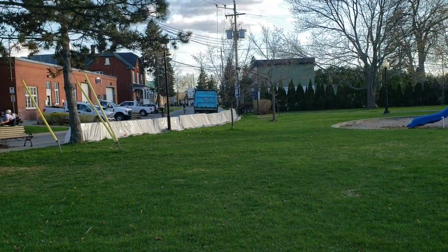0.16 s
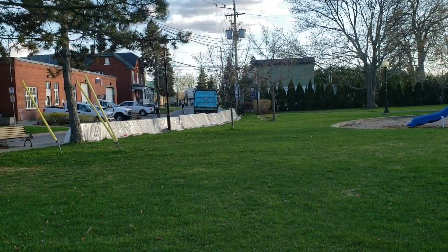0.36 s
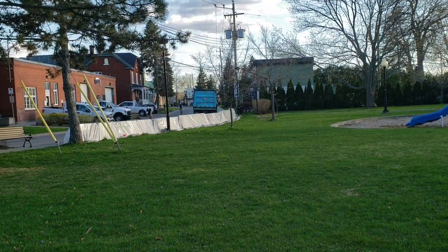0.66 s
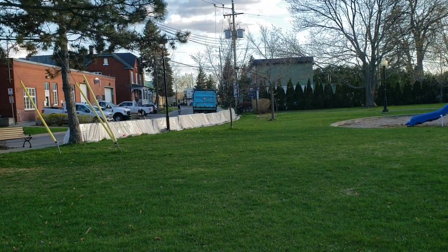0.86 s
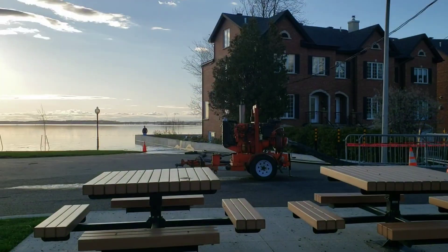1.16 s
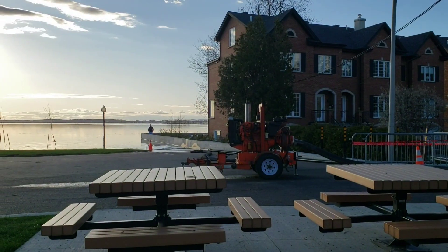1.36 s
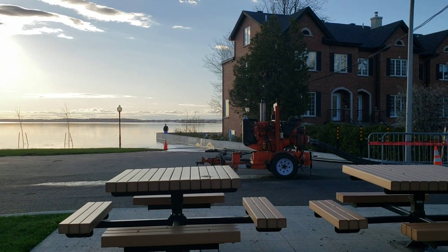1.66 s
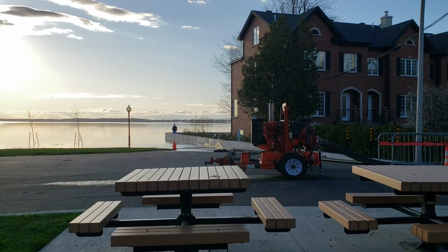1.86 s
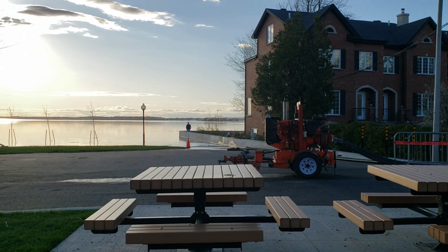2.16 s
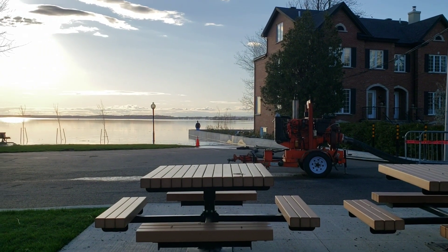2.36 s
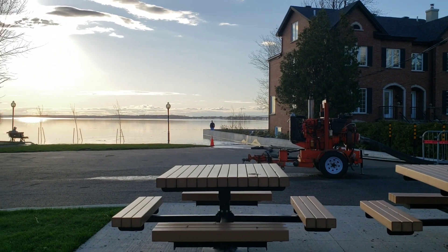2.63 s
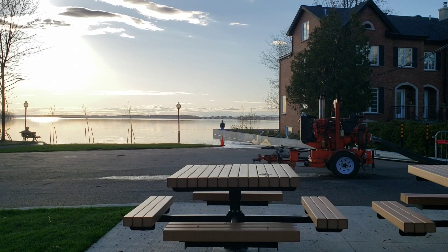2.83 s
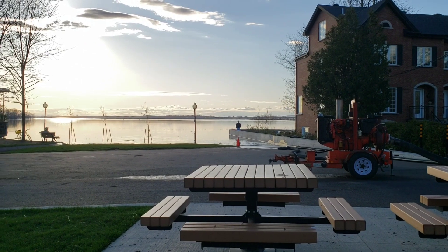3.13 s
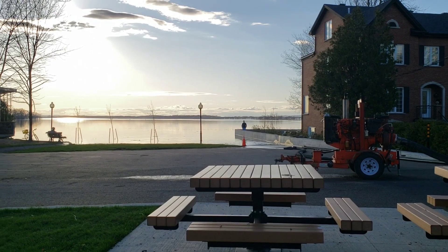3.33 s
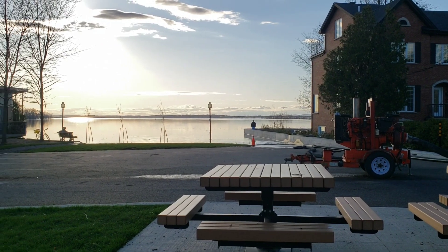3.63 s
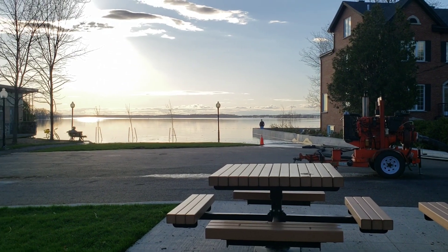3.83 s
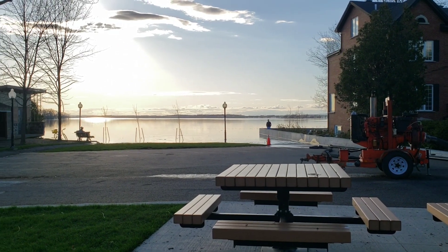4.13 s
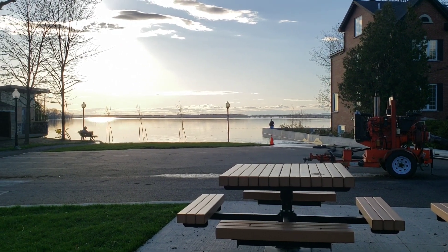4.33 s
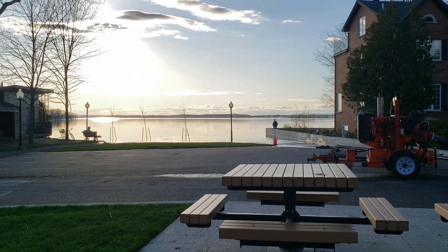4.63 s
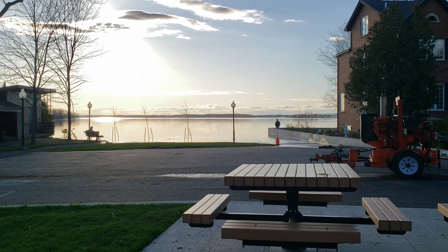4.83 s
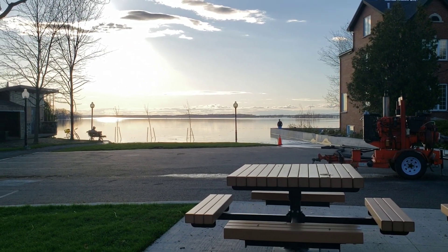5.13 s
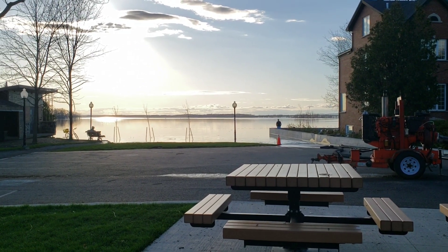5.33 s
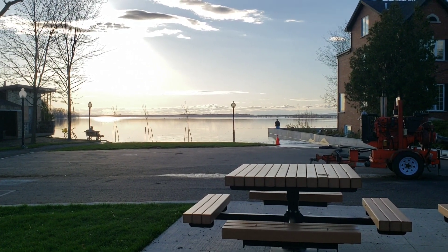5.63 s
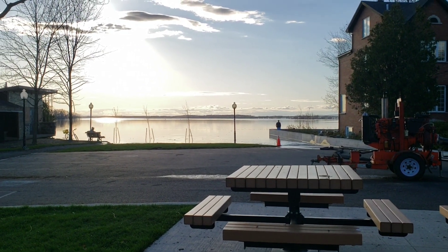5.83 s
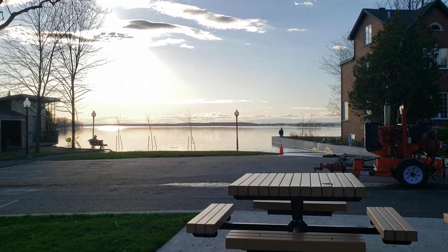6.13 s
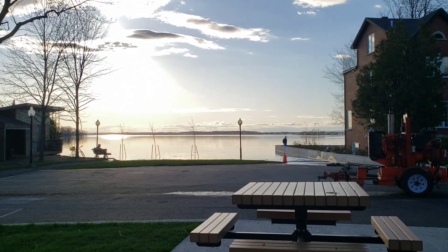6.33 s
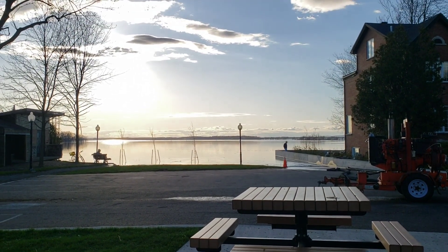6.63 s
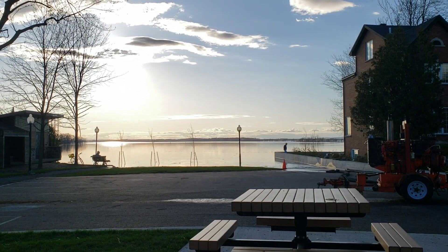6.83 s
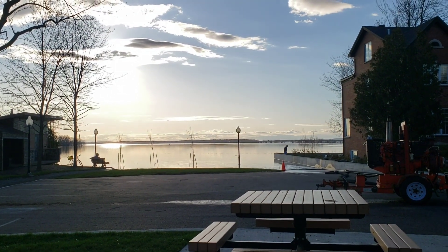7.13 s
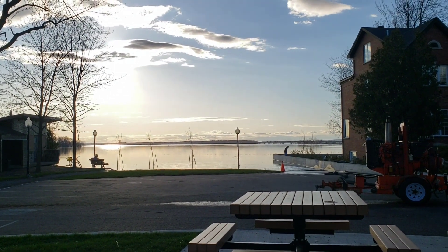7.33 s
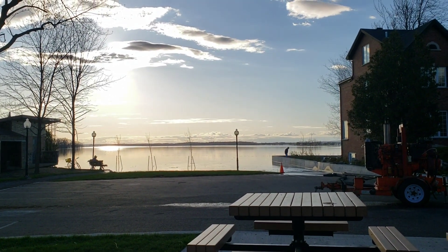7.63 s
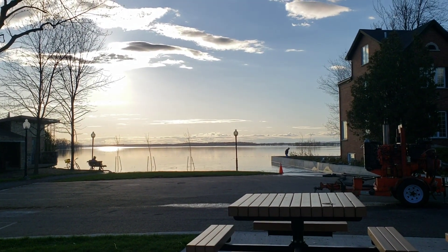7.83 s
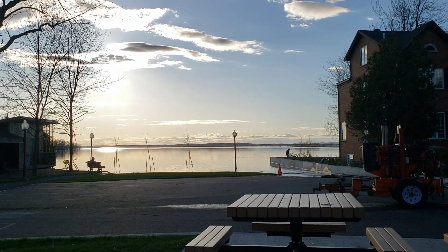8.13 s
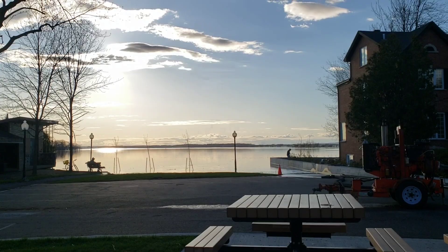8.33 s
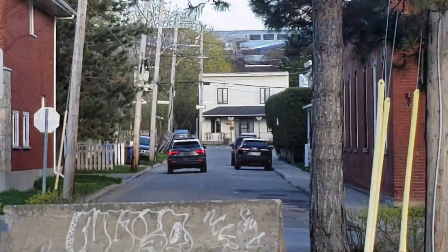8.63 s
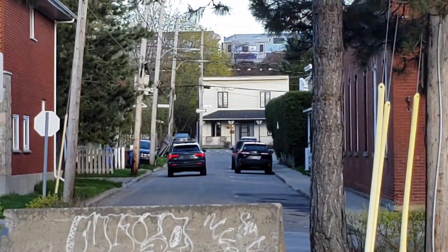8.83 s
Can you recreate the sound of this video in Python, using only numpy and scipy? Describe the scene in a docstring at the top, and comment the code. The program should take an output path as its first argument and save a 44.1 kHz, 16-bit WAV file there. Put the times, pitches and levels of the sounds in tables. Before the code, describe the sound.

A faint park rumble fades into a diesel pump droning, clattering and hissing, which gives way to a car idling on a street.

```python
"""A trailer-mounted diesel flood pump runs on a lakeside road. Its exhaust drones at harmonics of the cycle
rate, combustion knocks ring the block, and a slower pump shaft clatters and puffs hissing air from a vent.
The scene opens with a far rumble across a park, which fades into the pump; the pump swells once and holds
while the microphone pans, then fades into a street where a car engine idles."""
import sys
import numpy as np
from scipy import signal
from scipy.fft import rfft, irfft, next_fast_len
from scipy.io import wavfile
from scipy.ndimage import map_coordinates

SR = 44100
rng = np.random.default_rng(int(sys.argv[2]) if len(sys.argv) > 2 else 0)


def store_pcm(level_fs):
    """Save levels as 16-bit WAV."""
    pcm = np.round(np.clip(level_fs, -1, 1) * 32767).astype(np.int16)
    wavfile.write(sys.argv[1], SR, np.atleast_2d(pcm).T)


N = 396018
TIME = np.arange(N) / SR

# interaural level difference of the pump: f/Hz, left minus right level/dB
PUMP_BALANCE = [(60, 0.5), (110, -1), (200, 1.5), (700, 1), (1300, 2), (2400, 3.5), (4400, 0.5),
                (8100, -1.5), (15000, -3)]


def from_db(db):
    """Amplitude ratio of a level: a factor of ten per 20 dB."""
    return 10 ** (np.asarray(db) / 20)


def rms_one(x):
    """Normalisation to unit mean power."""
    return x / np.sqrt(np.mean(x ** 2) + 1e-20)


def ramp(start_s, end_s):
    """Linear rise from 0 to 1 between two times."""
    return np.clip((TIME - start_s) / (end_s - start_s), 0, 1)


def drift(rate_hz):
    """Slow random modulation: straight lines between Gaussian values of unit variance."""
    knots = rng.standard_normal(2000)
    return np.interp(TIME * rate_hz, np.arange(len(knots)), knots)


def at_bins(points, size):
    """Interpolation of a table over log frequency onto the bins of a spectrum."""
    hz, value = np.transpose(points)
    return np.interp(np.log(np.fft.rfftfreq(size, 1 / SR) + 1e-9), np.log(hz), value)


def colour(x, spectrum):
    """Zero-phase filtering by a table of f/Hz, gain/dB."""
    size = next_fast_len(x.shape[-1], True)
    return irfft(rfft(x, size) * from_db(at_bins(spectrum, size)), size)[..., :x.shape[-1]]


def resonate(x, modes):
    """Modal superposition: damped resonators in parallel, alternating in sign; rms 1."""
    out = 0
    for k, (hz, width_hz, db) in enumerate(modes):
        r = np.exp(-np.pi * width_hz / SR)
        poles = [1, -2 * r * np.cos(2 * np.pi * hz / SR), r * r]
        out = out + (-1) ** k * from_db(db) * signal.lfilter([1 - r * r, 0, r * r - 1], poles, x)
    return rms_one(out)


def orders(cycles, table, waver):
    """Rotational orders: sines phase-locked to a shaft, each with random amplitude modulation."""
    out = 0
    for multiple, db in table:
        amplitude = np.sqrt(2) * from_db(db) * (1 + waver * drift(28))
        out = out + amplitude * np.sin(2 * np.pi * (multiple * cycles + rng.random()))
    return out


def ambience(spectrum, coherence, balance):
    """Partially coherent noise at two ears, mixed from a common and an opposed part; rms 1."""
    size = next_fast_len(N, True)
    mid, side = rfft(rng.standard_normal((2, size))) * from_db(at_bins(spectrum, size))
    alike = at_bins(coherence, size)
    ears = np.sqrt(1 + alike) * mid + np.sqrt(1 - alike) * side * [[1], [-1]]
    ear_gains = from_db(at_bins(balance, size) * [[.5], [-.5]])
    return rms_one(irfft(ears * ear_gains, size)[:, :N])


def park():
    """Superposition of far machinery: rumble, thin whistles, an engine's throb and a passing hum."""
    # far rumble: f/Hz, relative level/dB
    rumble_spectrum = [(20, -22), (40, -9), (62, -1), (100, -2), (170, -5), (280, -10), (330, -13),
                       (410, -12), (470, -22), (900, -21), (1300, -28), (1800, -21), (2900, -29),
                       (5500, -26), (8000, -29), (10000, -43), (12000, -38), (15500, -43)]
    # its likeness at the ears: f/Hz, coherence
    coherence = [(60, 0.8), (290, 0.94), (640, 0), (1400, 0), (15000, 0)]
    # machinery whistles: f/Hz, bandwidth/Hz, relative level/dB
    whistle_modes = [(1890, 570, 0.5), (3740, 87, -3), (4930, 55, -4), (5950, 88, -2), (6280, 110, -2),
                     (7000, 50, -4), (8200, 67, -4), (12800, 360, -16)]
    hum_hz, firing_hz = 248, 62.6
    hum = np.sqrt(2) * np.sin(2 * np.pi * np.cumsum(hum_hz + 3.1 * drift(13.3)) / SR)
    hum *= ramp(.15, .57) * (1 - ramp(.65, .73))
    throb = from_db(-4) * (1 + .34 * drift(6.1)) * np.sqrt(2) * np.sin(2 * np.pi * firing_hz * TIME)
    rumble = ambience(rumble_spectrum, coherence, balance=[(100, -.5), (5000, .4)])
    whistles = from_db(-8.5) * resonate(rng.standard_normal((2, N)), whistle_modes)
    return from_db(-49 + 1.5 * TIME) * (rumble + whistles + throb) + from_db(-53) * hum


def street():
    """Periodic firing makes an idling car throb over the broadband noise of traffic."""
    # engine orders: multiple of the firing rate, level/dB relative to the traffic
    car_orders = [(.8, -18), (1, 3), (1.2, -2), (1.4, -6.5), (1.8, -4.5), (2, -8), (2.4, -13), (3, -24)]
    # traffic noise: f/Hz, relative level/dB
    traffic_spectrum = [(25, -22), (60, 4.5), (100, -4), (160, -6.5), (240, -4), (330, -9), (500, -15.5),
                        (750, -13), (1300, -15.5), (3000, -16.5), (4300, -14), (5500, -24.5), (7500, -24.5),
                        (9000, -35.5), (15000, -31)]
    # its likeness at the ears: f/Hz, correlation
    coherence = [(60, 0.99), (130, 0.99), (290, 0.94), (640, 0.85), (1410, 0.42), (3100, -0.74),
                 (6820, 0.15), (15000, 0.03)]
    # its direction: f/Hz, left minus right level/dB
    balance = [(60, 1), (110, -4), (200, 1), (380, 2), (700, 2), (1290, 3), (2380, 2.5), (4400, 2.5),
               (8120, 10.5), (15000, 5)]
    firing_hz = 74.7
    firings = np.cumsum(firing_hz * (1 + .0019 * drift(16))) / SR
    car = orders(firings, car_orders, waver=.22)
    return from_db(-33) * (car + ambience(traffic_spectrum, coherence, balance))


def house_reflections(x, t60_s):
    """Reverberation: a short tail from the houses, different at each ear, lowers the coherence."""
    # likeness at the ears: f/Hz, coherence
    coherence = [(150, .998), (290, .985), (640, .93), (1400, .88), (2500, .6)]
    size, t = next_fast_len(N + SR, True), np.arange(SR // 2) / SR
    tail = rng.standard_normal((2, len(t))) * from_db(-60 * t / t60_s) * (t > .004)
    alike = at_bins(coherence, size)
    paths = np.sqrt(alike) + np.sqrt(1 - alike) * rfft(tail / np.linalg.norm(tail[0]), size)
    ear_gains = from_db(at_bins(PUMP_BALANCE, size) * [[.5], [-.5]])
    return irfft(rfft(x, size) * paths * ear_gains, size)[:, :N]


def frame_echoes(air):
    """Interference with echoes in the trailer frame: a tinny grain that shifts as the microphone pans."""
    echo_gain, t60_s, change_s = from_db(-2.5), .066, 2.2
    t, pattern = np.arange(SR // 25) / SR, TIME / change_s
    out = 0
    for k in range(int(pattern[-1]) + 2):
        echoes = rng.standard_normal((2, len(t))) * from_db(-60 * t / t60_s) * (t > .001)
        share = np.cos(np.pi / 2 * np.clip(pattern - k, -1, 1))   # equal-power crossfade
        out = out + share * signal.oaconvolve(air, echoes / np.linalg.norm(echoes[0]), axes=1)[:, :N]
    return (air + echo_gain * out) / np.hypot(1, echo_gain)


def swell(subdued, full):
    """Raised-cosine passage from the subdued value to the full one as the pump swells."""
    progress = .5 - .5 * np.cos(np.pi * ramp(2.32, 3.65))
    return subdued + (full - subdued) * progress


def vent_hiss(pump):
    """Jet noise from the priming vent excites cavity resonances; the treble puffs once a turn."""
    # air jet: f/Hz, relative level/dB
    jet_spectrum = [(700, -13.5), (1100, -11.5), (1500, -3.5), (2050, -6.5), (2650, -11.5), (3400, -8),
                    (4500, -8.5), (5800, -5.5), (7300, -5.5), (8200, -4.5), (9400, -12), (12000, -10.5),
                    (13400, -9), (15300, -10.5)]
    # its likeness at the ears: f/Hz, coherence
    coherence = [(1000, .8), (2500, .42), (5000, .74), (15000, .72)]
    # cavity whistles and high sizzle: f/Hz, bandwidth/Hz, relative level/dB
    whistle_modes = [(2700, 48, -11), (3510, 230, -7), (4005, 28, -2), (4350, 58, -3), (4530, 32, -1),
                     (4810, 68, -2), (5110, 30, 1), (5330, 150, 0), (5800, 90, 1.5), (6420, 100, 0)]
    sizzle_modes = [(7810, 33.4, -12), (8230, 29, 10), (8400, 69, -0.5), (9370, 56, 3), (10640, 44, 3),
                    (11130, 54, 6), (11500, 82, -1), (11630, 91, 3), (12300, 350, 3.5), (13000, 46, 2),
                    (13900, 57, -4), (15050, 650, 2)]
    jet = from_db(-31.5) * ambience(jet_spectrum, coherence, PUMP_BALANCE)
    flow = ambience([(1000, 0), (15000, 0)], coherence, PUMP_BALANCE)   # white noise
    whistles = from_db(swell(-39.5, -38)) * resonate(flow, whistle_modes)
    sizzle = from_db(-37) * resonate(flow, sizzle_modes)
    air = frame_echoes(jet + whistles + sizzle)
    treble = colour(air, [(4000, -30), (6500, -9), (8500, 0)])
    puff = from_db(1.5 * np.cos(4 * np.pi * (pump - .335)) + .55 * drift(18))
    return (air + treble * (puff - 1)) * from_db(.29 * drift(14))


def hiss_at_ears(air):
    """Directivity: the swollen hiss peaks at one moment of the pan and weakens to either side."""
    # colour of the subdued hiss against the full one: f/Hz, gain/dB
    subdued_colour = [(1200, 1), (2200, 0.5), (3300, -6), (4700, 0), (6000, -6.5), (7800, 2.5), (9000, -7),
                      (9800, 0.5), (12000, -1.5), (14000, -1), (15300, -3)]
    aim_s, falloff_db_per_s2, lag_ms = 5.62, .19, .182
    off_aim_db = swell(0, falloff_db_per_s2 * (TIME - aim_s) ** 2)
    left, right = from_db(swell(-6, 1.1) - off_aim_db) * swell(colour(air, subdued_colour), air)
    # the hiss reaches the left ear slightly later, by a constant lag, so it sits on the right
    return np.array([np.roll(left, round(lag_ms * SR / 1000)), right])


def strikes(cycles, phase, spread_db, jitter_s):
    """Impulse train: one click a cycle at the given phase, uneven in strength and time."""
    onsets = np.flatnonzero(np.diff(np.floor(cycles - phase)) > 0)
    timing, strength = rng.standard_normal((200, 2))[:len(onsets)].T
    onsets += (timing * jitter_s * SR).astype(int)
    clicks = np.zeros(N)
    clicks[np.clip(onsets, 0, N - 1)] = from_db(spread_db * strength)
    return clicks


def rattle(power, t60_s):
    """Exponential decay of energy: every blow leaves a dying burst of noise."""
    retained = from_db(-60 / (t60_s * SR)) ** 2
    energy = signal.lfilter([1], [1, -retained], power + 1e-18)
    return np.sqrt(energy) * rng.standard_normal(N)


def diesel_knock(engine):
    """Impulse excitation: combustion knocks and the loose parts they shake ring the block's modes."""
    # knocks: phase/cycles, relative level/dB
    knocks = [(.07, 3), (.14, -9.5), (.23, -2.5), (.58, 0.5), (.64, 1.5), (.74, -12)]
    # engine block: f/Hz, bandwidth/Hz, relative level/dB
    block_modes = [(1149, 52, -9), (1427, 54, -1), (1637, 73, -4), (1739, 31, -2.5), (1995, 132, -8.5),
                   (3270, 1240, -14)]
    blows = sum(from_db(db) * strikes(engine, phase, spread_db=.6, jitter_s=.00015)
                for phase, db in knocks)
    loose_parts = from_db(-4) * rms_one(rattle(blows ** 2, t60_s=.037))
    return from_db(-38) * resonate(rms_one(blows) + loose_parts, block_modes)


def casing_clatter(pump):
    """Impact sound: each contact rings the casing with its own impulse response, plus random rattle."""
    # pump contacts: phase/cycles, relative level/dB
    contacts = [(.01, -4.5), (0.119, -3), (0.428, -6.5), (.545, -3.5), (.62, -5.5)]
    # casing response: f/Hz, gain/dB
    casing_response = [(450, -42), (540, -14.5), (620, -1.5), (800, -4), (900, -1), (1000, -15),
                       (1250, -14.5), (2000, -21.5)]
    t60_s, t = .12, np.arange(SR // 10) / SR
    decay = from_db(-60 * t / t60_s)
    ring, power = 0, 0
    for phase, db in contacts:
        clicks = from_db(db) * strikes(pump, phase, spread_db=1.2, jitter_s=.00008)
        ring = ring + signal.oaconvolve(clicks, decay * rng.standard_normal(len(t)))[:N]
        power = power + clicks ** 2
    return from_db(-43.5) * rms_one(colour(ring + rattle(power, t60_s), casing_response))


def drone(engine, pump):
    """Pulsating flow: exhaust and pump harmonics, with gas rumble and resonances that surge each turn."""
    # harmonics of each shaft: multiple of its cycle rate, relative level/dB
    exhaust_orders = [(2, -80), (4, -36), (6, -46.5), (8, -48), (9, -77.5), (10, -47.5), (12, -59),
                      (13, -62), (15, -77), (16, -51.5), (19, -58.5), (26, -45)]
    pump_orders = [(8, -48.5), (12, -46), (13, -49), (20, -50), (26, -55.5)]
    # exhaust gas: f/Hz, relative level/dB
    gas_spectrum = [(20, -26), (35, -14), (55, 4), (85, -1.5), (110, 1), (150, 0.5), (200, -0.5), (290, -1),
                    (320, -36), (420, -6.5), (480, -32.5), (800, -6.5), (1100, -19)]
    # fan hum (first row), muffler and pump pipe: f/Hz, bandwidth/Hz, relative level/dB
    fan_and_muffler_modes = [(165.8, 2.6, 3), (251.3, 18.4, -5.5), (373.7, 19.3, -6.5)]
    pipe_modes = [(403.5, 5.7, 0)]
    tones = orders(engine, exhaust_orders, waver=.055) + orders(pump, pump_orders, waver=.06)
    tones = colour(tones, [(300, 0), (400, -10)])   # the muffler attenuates the high orders
    surge = from_db(2.7 * np.cos(4 * np.pi * (engine - .27)))
    stroke = from_db(2.8 * np.cos(4 * np.pi * (pump - .14)))
    rumble = from_db(-35.5) * rms_one(colour(rng.standard_normal(N), gas_spectrum)) * surge
    muffler = from_db(-45.5) * resonate(rng.standard_normal(N) * surge, fan_and_muffler_modes)
    pipe = from_db(-52) * resonate(rng.standard_normal(N), pipe_modes) * rms_one(stroke)
    return tones + rumble + muffler + pipe


def flood_pump():
    """Two shafts time the whole machine; an interaural delay places it to the right, across the road."""
    # shaft speeds, two turns to a cycle: t/s, engine cycle rate/Hz, pump cycle rate/Hz
    speeds = [(2.0, 15.598, 11.329), (3.7, 15.646, 11.382), (5.0, 15.597, 11.368), (6.3, 15.595, 11.364),
              (7.6, 15.617, 11.35)]
    times, engine_hz, pump_hz = np.transpose(speeds)
    engine = np.cumsum(np.interp(TIME, times, engine_hz)) / SR   # phase/cycles
    pump = np.cumsum(np.interp(TIME, times, pump_hz)) / SR
    body = from_db(swell(-9.5, .08)) * drone(engine, pump)
    body += from_db(swell(-8, 2.5)) * (diesel_knock(engine) + casing_clatter(pump))
    left, right = house_reflections(body, t60_s=.15)
    # the left ear lags more as the microphone pans left and comes to rest
    lag_ms = .075 + .125 * ramp(1.47, 4.84)
    left = map_coordinates(left, [np.arange(N) - lag_ms * SR / 1000], order=5, mode="nearest")
    return np.array([left, right]) + hiss_at_ears(vent_hiss(pump))


def scene():
    """Linear crossfades lead from park to pump to street."""
    return (park() * (1 - ramp(.92, 1.2))
            + flood_pump() * ramp(.92, 1.16) * (1 - ramp(8.26, 8.86))
            + street() * ramp(8.39, 8.774))


def record(dry):
    """Band limiting: an elliptic low-pass cuts the top steeply."""
    cutoff_hz = 15700
    return signal.sosfilt(signal.ellip(12, .1, 80, cutoff_hz, fs=SR, output="sos"), dry)


dry = scene()
out = record(dry)
store_pcm(out)
```